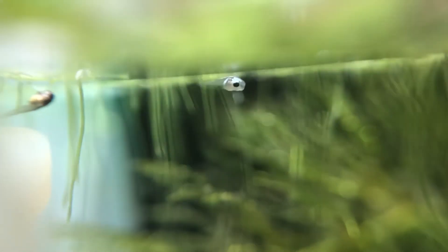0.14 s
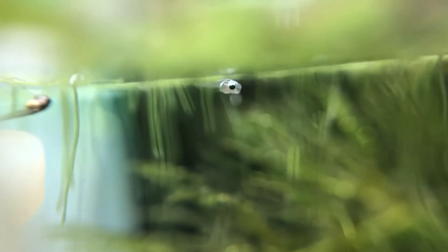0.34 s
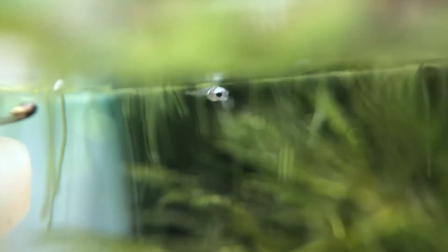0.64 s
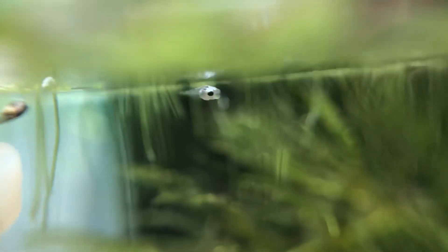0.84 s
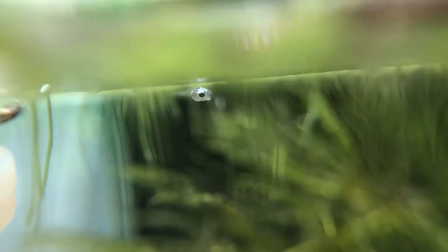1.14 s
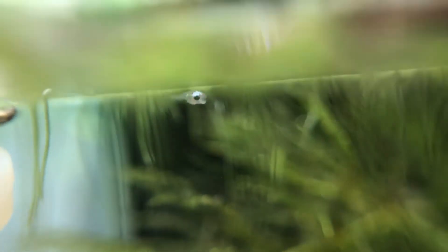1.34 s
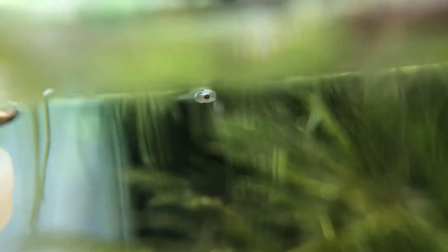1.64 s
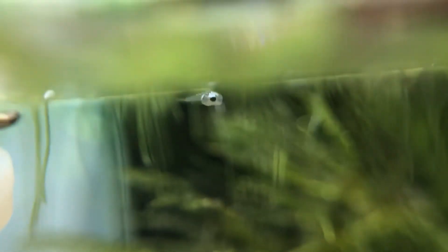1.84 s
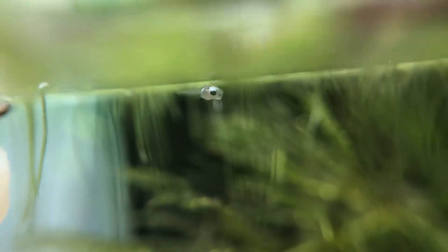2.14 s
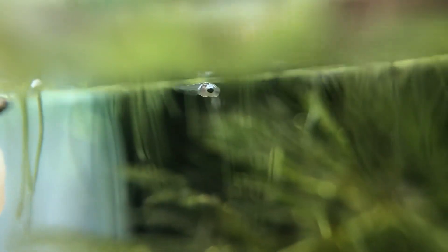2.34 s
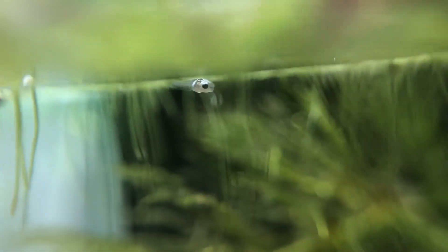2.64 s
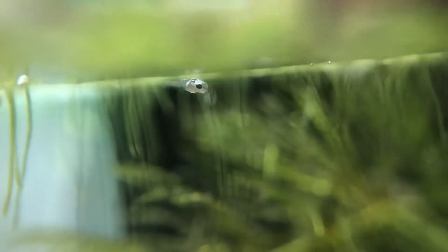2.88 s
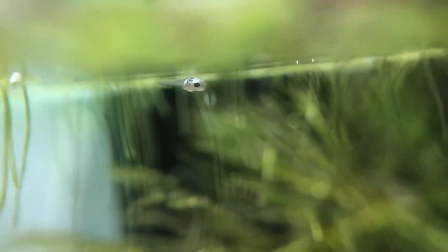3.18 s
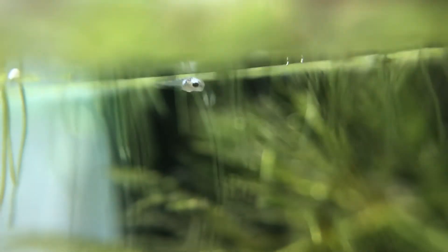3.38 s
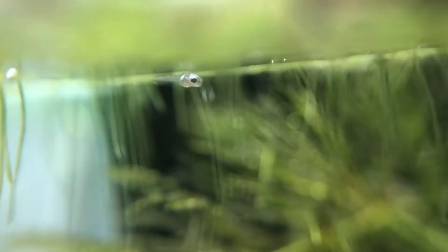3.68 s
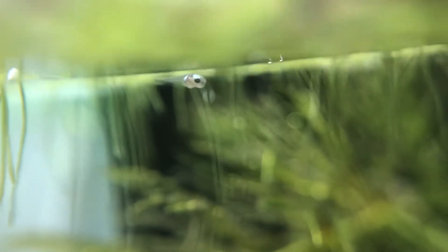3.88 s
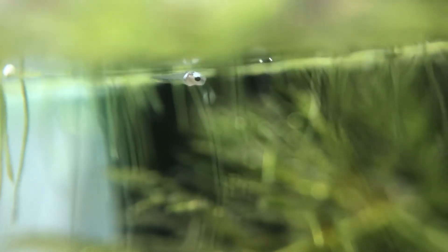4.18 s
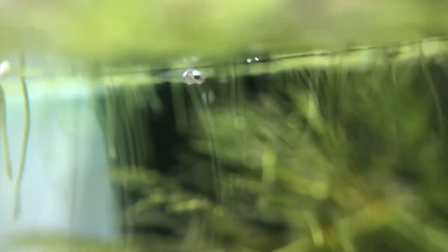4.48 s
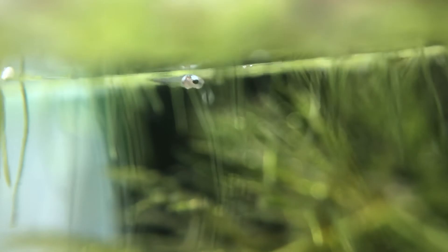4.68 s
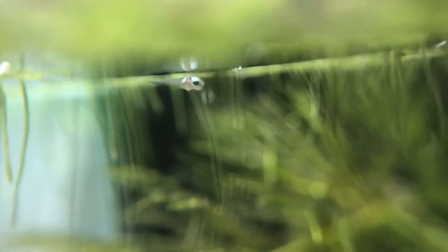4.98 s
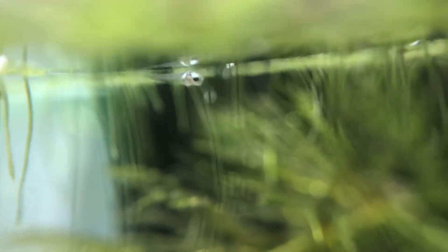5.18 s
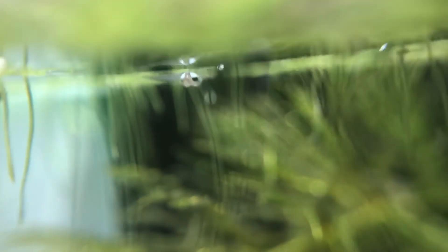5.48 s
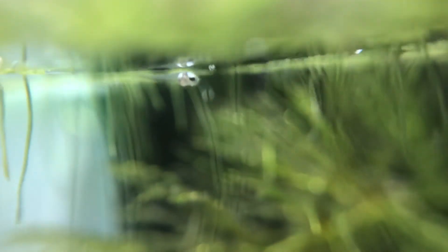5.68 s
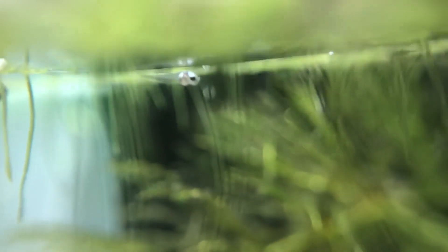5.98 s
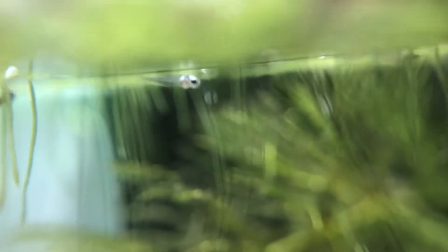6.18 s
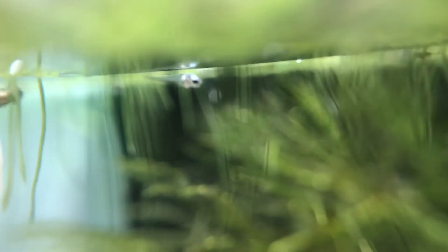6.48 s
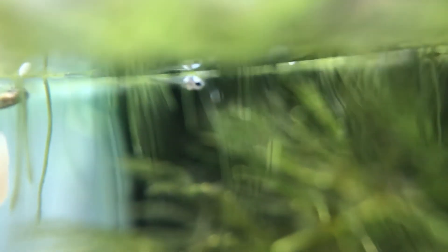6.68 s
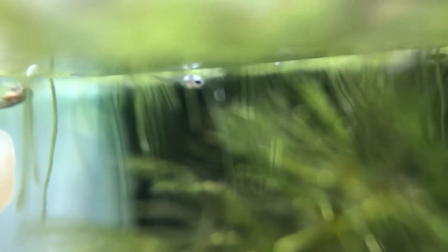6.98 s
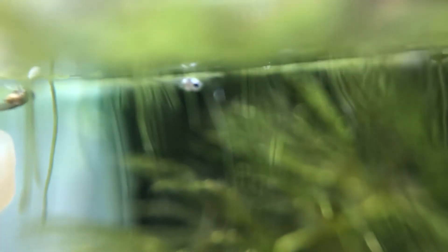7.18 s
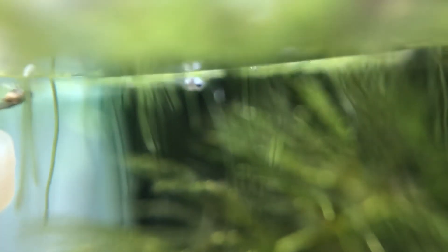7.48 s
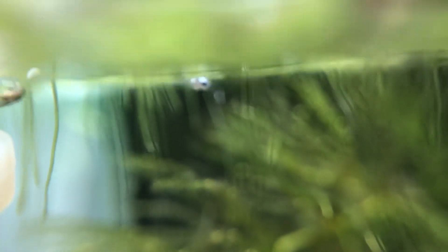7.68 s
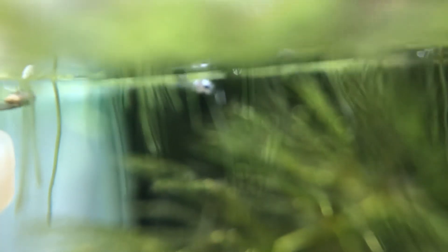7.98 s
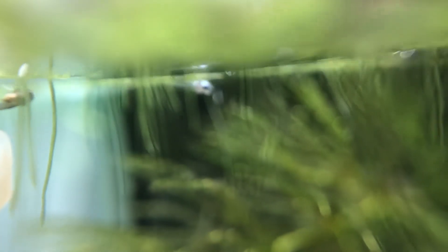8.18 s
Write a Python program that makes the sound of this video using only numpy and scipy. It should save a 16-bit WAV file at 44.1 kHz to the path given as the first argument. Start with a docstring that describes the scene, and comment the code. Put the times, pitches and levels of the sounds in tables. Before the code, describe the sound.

A quick chain of hollow bubble pops and glugs plays inside a fish tank over low equipment hum, with two sharp clicks on the glass.

```python
"""Gurgling home aquarium

Water gurgles in a home aquarium, heard close and dull through its glass wall.
Bubbles come in a quick chain, each a pop and then short gliding rings, over noisy swarms that stir the
tank's resonances; the biggest stand out as glugs. Small ticks and rustles touch the tank, and twice
the glass is knocked: a click whose high pitches arrive before its low ones.
Underneath, the equipment hums at mains rate and gives off a buzz, hiss and a thin, chopped whine."""
import sys
import numpy as np
from scipy import signal
from scipy.fft import rfft, irfft, next_fast_len
from scipy.io import wavfile
from scipy.ndimage import uniform_filter1d

SR = 44100
rng = np.random.default_rng(int(sys.argv[2]) if len(sys.argv) > 2 else 0)


def master_out(mix):
    """Clip the mix to full scale and print it as 16-bit PCM to the path in sys.argv[1]."""
    frames = np.transpose(np.atleast_2d(mix))
    ceiling = np.clip(frames, -1, 1)
    pcm = np.round(ceiling * 32767).astype(np.int16)
    wavfile.write(sys.argv[1], SR, pcm)


N = 367353  # length in samples

# Single big bubbles: loudest_s, pitch_hz, peak_db, fade_s, glide (share of the pitch per second)
GLUGS = [(0.065, 738, -34.5, 0.016, 2.5), (0.076, 553, -32, 0.0097, -5.5), (0.088, 554, -32.5, 0.007, 4),
         (0.119, 570, -29, 0.0058, -1), (0.431, 557, -27.5, 0.0068, 2), (0.456, 566, -24.5, 0.0065, -1),
         (0.468, 850, -35.5, 0.004, 1), (0.587, 558, -29, 0.014, -0.5), (1.006, 577, -26, 0.0085, 0),
         (1.107, 550, -23.5, 0.003, 1.5), (1.176, 553, -22.5, 0.03, 1), (1.193, 607, -24, 0.028, -5),
         (1.21, 647, -26.5, 0.01, -3.5), (1.283, 599, -23, 0.0043, -2.5), (1.385, 562, -19.5, 0.0041, -3),
         (1.495, 584, -12, 0.0047, -1.5), (1.511, 536, -21, 0.0067, -2), (1.612, 594, -20.5, 0.0076, 1.5),
         (1.634, 549, -21.0, 0.006, 2), (1.677, 556, -18.5, 0.0044, 2.5), (1.693, 582, -15.5, 0.0065, 3),
         (1.713, 590, -22, 0.006, -6.5), (1.732, 732, -24, 0.0073, -0.5), (1.735, 527.5, -26, 0.022, 0.5),
         (1.751, 638, -19.5, 0.009, -5.5), (1.758, 882, -28, 0.0048, 2), (1.776, 625, -19.5, 0.0077, -5),
         (1.777, 903, -32, 0.0049, 2.5), (1.804, 618, -24.5, 0.0093, -2), (1.848, 586, -17.5, 0.0033, 0.5),
         (2.076, 532, -21.5, 0.005, -2), (2.116, 910, -33, 0.006, 1), (2.138, 490, -22.5, 0.0047, 6.5),
         (2.23, 503, -27.5, 0.0071, 8), (2.272, 547, -22, 0.0047, 5), (2.41, 722, -29.5, 0.0081, -4),
         (2.422, 502, -27, 0.0066, -10), (2.439, 520, -24.5, 0.0084, 3.5), (2.728, 546, -26, 0.0049, 4),
         (2.839, 532, -26, 0.0061, -8), (2.87, 508, -26, 0.0043, 0), (2.92, 525, -24, 0.0043, 8),
         (3.159, 884, -31.5, 0.0072, 1), (3.166, 527, -19, 0.0057, 1.5), (3.182, 500, -24.5, 0.0041, 9),
         (3.185, 708, -29, 0.009, -1.5), (3.27, 499, -26.5, 0.012, 2), (3.42, 523, -19.5, 0.0071, -4.5),
         (3.626, 536, -27.5, 0.012, 0), (3.73, 508, -26, 0.0098, 0), (3.746, 487, -18.5, 0.0035, 9),
         (3.753, 300, -24, 0.0039, -10), (3.789, 490, -21, 0.0043, 2), (3.807, 267, -27.5, 0.0077, 6),
         (3.808, 572, -21, 0.004, 3), (3.853, 521, -26, 0.011, -5.5), (4.074, 278, -21.5, 0.0069, -1),
         (4.094, 439, -24.5, 0.0073, -3), (4.125, 567, -22, 0.004, 1), (4.236, 557, -22, 0.0041, -6),
         (4.303, 524, -20, 0.0093, 7.5), (4.397, 405, -24.5, 0.0054, 6), (4.551, 520, -24, 0.0035, 3),
         (4.609, 282, -23.5, 0.0049, -5), (4.614, 500, -14, 0.0038, 14), (4.63, 289, -23, 0.0037, -8),
         (4.63, 579, -18.5, 0.0078, 3), (4.65, 490, -21.5, 0.0046, 12), (4.908, 730, -29, 0.008, 0.5),
         (4.936, 506, -20, 0.0042, 5), (4.936, 922, -29.5, 0.0069, 1.5), (4.953, 890, -28.5, 0.0047, -12),
         (4.973, 873, -28.5, 0.0088, 1), (4.99, 514, -21.5, 0.0043, 6), (5.02, 506, -19.5, 0.004, 5),
         (5.041, 568, -14.5, 0.0027, 6), (5.057, 518, -25.5, 0.012, -2), (5.115, 493, -21, 0.0035, 7),
         (5.131, 582, -21.5, 0.0052, 7), (5.325, 442, -26.5, 0.009, 2), (5.341, 533, -23.5, 0.0081, 8.5),
         (5.357, 625, -21.5, 0.004, -3), (5.359, 280, -27, 0.011, 1), (5.363, 505, -22, 0.0037, 14),
         (5.445, 556, -21.5, 0.0075, 6), (5.531, 543, -23.5, 0.0055, -1), (5.628, 524, -15.5, 0.0033, 11),
         (5.674, 533, -18, 0.0027, 7), (5.71, 940, -23, 0.0023, -10), (5.713, 496, -21.5, 0.0056, 4),
         (5.722, 1027, -34.5, 0.011, -0.5), (5.735, 907, -29, 0.0066, -4.5),
         (5.809, 532, -20.5, 0.0092, 1.5), (5.939, 492, -20.5, 0.0036, -4), (5.942, 365, -29, 0.0073, 0),
         (6.005, 535, -19.5, 0.0037, -2), (6.033, 493, -22.5, 0.0038, 8), (6.098, 552, -19, 0.0063, 4),
         (6.121, 514, -19, 0.0027, 8), (6.177, 520, -20, 0.0034, 9), (6.255, 361, -26.5, 0.0082, 0),
         (6.377, 494, -22.5, 0.0035, -3), (6.396, 524, -22.5, 0.0053, -5.5), (6.437, 536, -27, 0.0043, 5),
         (6.634, 512, -25, 0.01, 7.5), (6.838, 546, -18.5, 0.0055, 5), (6.852, 610, -21.5, 0.0053, 0),
         (6.896, 472, -23.5, 0.005, 9), (6.942, 286, -17.5, 0.0044, 3), (6.945, 523, -23.5, 0.0066, 11),
         (7.007, 508, -21.5, 0.0043, -1), (7.044, 518, -19, 0.0039, 20), (7.103, 480, -20, 0.0035, 3.5),
         (7.124, 540, -18.5, 0.0037, 4), (7.173, 408, -19, 0.0056, 2), (7.178, 283, -24.5, 0.007, 8),
         (7.211, 580, -15.5, 0.0066, 0), (7.232, 508, -20, 0.0038, -4.5), (7.377, 525, -19.5, 0.0034, 0.5),
         (7.451, 534, -16.5, 0.004, 0.5), (7.559, 571, -24, 0.016, -5), (7.639, 475, -19.5, 0.0063, 5.5),
         (7.643, 730, -24.5, 0.0094, 0), (7.644, 292, -24, 0.012, 0), (7.689, 270, -23.5, 0.0075, -5),
         (7.693, 498, -20, 0.004, 5), (7.711, 557, -18, 0.0052, 8.5), (7.733, 537, -16, 0.0049, -6.5),
         (7.737, 283, -25.5, 0.012, 2), (7.779, 477, -20.5, 0.0035, 5.5), (7.815, 540, -20, 0.006, 9.5),
         (7.833, 719, -28, 0.01, -0.5), (7.859, 483, -25, 0.012, -1), (7.937, 289, -25, 0.0049, -6),
         (7.942, 500, -18.5, 0.0033, 12), (7.959, 533, -21.5, 0.0076, 2), (7.985, 530, -17, 0.0035, 3),
         (7.989, 286, -24, 0.0085, 9), (8.025, 507, -22.5, 0.0036, 10), (8.048, 524, -23, 0.0043, -6),
         (8.067, 514, -23, 0.008, -5)]
# The loudest pops, each the start of a bubble: start_s, level_db (before a common lift)
POPS = [(0.010, -41.5), (0.106, -43.5), (0.347, -44), (0.466, -42.5), (0.555, -42), (0.667, -43),
        (1.095, -37), (1.197, -41.0), (1.439, -34), (1.483, -37.5), (1.533, -39.0), (1.581, -40.5),
        (1.667, -37.5), (1.744, -36.5), (2.052, -39.5), (2.129, -40.5), (2.433, -43.5), (2.614, -40),
        (2.711, -36), (2.929, -38.5), (3.155, -38.5), (3.251, -41), (3.714, -38.5), (3.777, -38.5),
        (3.887, -41.5), (3.972, -40), (4.183, -39.5), (4.387, -40), (4.434, -40), (4.52, -40.5),
        (4.64, -36), (4.816, -31.5), (4.88, -39), (4.926, -42), (4.969, -42.5), (5.029, -41.5),
        (5.253, -41), (5.5, -37.5), (5.535, -40.5), (5.579, -39.0), (5.855, -41.5), (6.025, -39.5),
        (6.083, -40.5), (6.165, -41), (6.206, -41), (6.25, -45), (6.306, -45), (6.346, -42.5), (6.381, -42),
        (6.638, -40), (6.692, -40), (6.78, -34), (6.819, -39.5), (6.881, -40.0), (6.934, -36), (7.032, -41),
        (7.077, -38), (7.166, -40.0), (7.198, -32), (7.287, -41.5), (7.325, -42.5), (7.461, -45),
        (7.568, -41.5), (7.61, -43.5), (7.722, -39), (7.769, -36), (7.93, -40.5), (7.993, -43),
        (8.055, -43), (8.092, -41)]
# Resonances of the water-filled tank, for large, middle and small bubbles:
# pitch_hz, width_hz (of one filter pass), level_db (relative, used in the swarms only)
LARGE_MODES = [(255.7, 35.3, 1.5), (297.2, 29.8, 0), (380.5, 63, 1), (439, 60, -0.5)]
MIDDLE_MODES = [(481.8, 50, -4), (546.5, 44.3, 1.5), (601.7, 59, -3)]
SMALL_MODES = [(716.4, 62, 0.5), (770, 150, -13.5), (879, 60, -7.5)]
# Tone colour of a pop: frequency_hz, gain_db (relative)
POP_COLOUR = [(300, -47), (600, -22), (900, -0.5), (1080, 4.5), (1280, 3), (1400, -19.5), (1500, -8.5),
              (1750, -23.5), (2300, -37), (4000, -71.5), (16000, -100)]
# The pitch that middle bubbles favour, before random scatter: time_s, pitch_hz
MIDDLE_PITCH = [(0, 566.7), (1.85, 575), (2.25, 516.5), (8.33, 511)]

MAINS_HZ = 59.99
SPREAD_CYCLES = 1.35  # how late the glass delivers each pitch, in cycles of that pitch
BUBBLES_PER_S = 50  # approximate rate of the chain
MIDDLE_LAG_S = 0.011  # from a pop to the main ring of its bubble


def from_db(db):
    """Turn decibels into a gain."""
    return 10 ** (np.asarray(db) / 20)


def rms_one(x):
    """Scale a sound to an average (rms) strength of 1."""
    return x / np.sqrt(np.mean(x ** 2) + 1e-20)


def in_time(rows):
    """Join the points of each column by straight lines in time."""
    s, *columns = np.transpose(rows)
    return [np.interp(np.arange(N) / SR, s, column) for column in columns]


def at_times(curve, s):
    """Read a curve at the moments s, in seconds."""
    return np.interp(s * SR, np.arange(N), curve)


def wander(per_s):
    """Slow random curve with a spread near 1, joining `per_s` new values a second."""
    values = rng.standard_normal(1000)
    return np.interp(np.arange(N) / SR * per_s, np.arange(len(values)), values)


def chance(s, count):
    """Draw `count` limited bell-curve values for each moment; moments in one 10 ms slot share them."""
    draws = np.clip(rng.standard_normal((1000, count)), -2, 2)
    return draws[(s * 100).astype(int)].T


def coloured(x, colour, spread=0, tilt_db=0):
    """Shape a spectrum. Bending waves in glass carry highs faster: each pitch comes about `spread` cycles late."""
    size = next_fast_len(len(x) + SR // 2)
    hz = np.maximum(np.arange(size // 2 + 1) * SR / size, 1)
    points = np.array(colour, float)
    octaves = np.log2(hz / 300)  # the tilt leaves 300 Hz alone
    colour_db = np.interp(np.log(hz), np.log(points[:, 0]), points[:, 1])
    gain = from_db(colour_db + tilt_db * octaves)
    spread_end_hz = 11  # keeps the delay of the very lowest pitches limited
    lag = np.exp(-2j * np.pi * spread * np.log(hz + spread_end_hz))
    return irfft(rfft(x, size) * gain * lag, size)[:len(x)]


def noise(colour):
    """Smooth noise of a given colour, with rms 1."""
    return rms_one(coloured(rng.standard_normal(N), colour))


def resonate(x, hz, width_hz):
    """Pass a sound through one resonance whose gain is 1 at its centre."""
    r = np.exp(-np.pi * width_hz / SR)
    feedback = [1, -2 * r * np.cos(2 * np.pi * hz / SR), r * r]
    return signal.lfilter(np.array([1, 0, -1]) * (1 - r * r) / 2, feedback, x + 1e-18)


def resonate_moving(x, hz, width_hz):
    """A resonance with a moving centre: shift the pitch curve to zero, smooth, and shift back."""
    turn = np.exp(2j * np.pi * np.cumsum(hz) / SR)
    r = np.exp(-np.pi * width_hz / SR)
    return 2 * np.real(turn * signal.lfilter([1 - r], [1, -r], x / turn + 1e-18))


def evened(x, seconds):
    """Hold the rms near 1 over a short stretch, keeping the grain within it."""
    size = max(int(seconds * SR), 8)
    power = uniform_filter1d(uniform_filter1d(x ** 2, size), size)
    return x / np.sqrt(np.abs(power) + np.mean(x ** 2) / 1e3)


def kicks(per_s, spread_db):
    """Pressure kicks at random moments, most small, a few large."""
    sizes_db = spread_db * np.minimum(rng.exponential(1, N), 4)
    sizes = from_db(sizes_db) * rng.choice([-1, 1], N)
    return sizes * (rng.random(N) < per_s / SR)


def swells(s, length_s, db):
    """Add the power of overlapping bell-shaped swells."""
    t = np.arange(0, N + 40, 40) / SR  # every 40 samples is fine enough
    bells = np.exp(-(2 * (t - s[:, None]) / length_s[:, None]) ** 2)
    return np.interp(np.arange(N) / SR, t, from_db(db) ** 2 @ bells)


def mains_hum(cycles):
    """Steady pure tones at whole multiples of the mains rate."""
    # multiple (of the mains rate), level_db (rms)
    hum_tones = [(1, -54.5), (2, -51)]
    hum = np.zeros(N)
    for multiple, db in hum_tones:
        hum += from_db(db) * np.sqrt(2) * np.sin(2 * np.pi * (round(multiple) * cycles + rng.random()))
    return hum


def buzz_and_whine(cycles):
    """One coloured tick per mains cycle, and narrow noise bands that drop out once per cycle."""
    # frequency_hz, gain_db (relative)
    buzz_colour = [(1200, -24), (1850, 3.5), (2200, -8.5), (2500, -2), (3200, -10.5), (4500, -25.5),
                   (9000, -42)]
    # pitch_hz, width_hz (halved; each band is filtered twice at double this), level_db (rms while sounding)
    whine_bands = [(5010, 35, -79.5), (5150, 260, -82), (10020, 76, -81), (15000, 90, -98.5)]
    gap_start, gap_share = 0.054, 0.24  # in shares of a mains cycle
    beat = np.diff(np.floor(cycles - gap_start - gap_share), prepend=-1)  # a tick as each gap ends
    buzz = from_db(-80.0) * rms_one(coloured(beat, buzz_colour, spread=7.3))
    running = uniform_filter1d(1.0 * ((cycles - gap_start) % 1 > gap_share), size=40)
    whine = np.zeros(N)
    for hz, width, db in whine_bands:
        band = resonate(resonate(rng.standard_normal(N), hz, 2 * width), hz, 2 * width)
        whine += from_db(db) * evened(band, 0.0036)
    return buzz + running * whine


def hiss_and_spit(cycles):
    """Steady coloured hiss, and bursts of brighter noise once per mains cycle."""
    # frequency_hz, gain_db (relative)
    hiss_colour = [(1500, -7.5), (2300, 0), (3400, -0.5), (4400, -3), (5900, -7.5), (6700, -1.5),
                   (7500, -8), (8500, -2.5), (10200, -8), (11500, -9.5), (15700, -14)]
    # how hard the hiss spits: time_s, level_db (rms with the pauses included)
    spit_curve = [(0, -83), (6.7, -83.5), (6.95, -80.5), (7.6, -78.5), (7.8, -81.5), (8.33, -82.5)]
    spit_db, = in_time(spit_curve)
    spitting = (cycles - 0.29) % 1 < 0.17  # start and length in shares of a cycle
    spit_colour = [(3000, -21.5), (6500, 0.0), (10000, -0.5), (12000, -16.0)]
    spit = from_db(spit_db) * rms_one(coloured(spitting * rng.standard_normal(N), spit_colour))
    return spit + from_db(-75) * noise(hiss_colour)


def equipment():
    """Electrical sounds, all timed by the same mains cycle."""
    cycles = MAINS_HZ * np.arange(N) / SR
    return mains_hum(cycles) + buzz_and_whine(cycles) + hiss_and_spit(cycles)


def stirred_water():
    """Low slosh and a soft wash: coloured noises that follow how much the water is stirred."""
    # time_s, level_db (before the offsets of slosh and wash)
    stir_curve = [(0, -44), (.23, -49.5), (.69, -46), (.88, -40), (1.5, -43.5), (1.8, -39.5), (2.2, -51.5),
                  (2.8, -52.5), (3.5, -50.5), (4.6, -47), (5.8, -49), (6.7, -46.5), (6.84, -42), (7.2, -49),
                  (8.33, -45.5)]
    # both colours: frequency_hz, gain_db (relative)
    slosh_colour = [(20, -34), (45, -8), (58, 10.5), (80, 2.5), (115, 2), (160, 10), (200, 1.5), (330, 4),
                    (700, -2.5), (1200, -43.5), (4000, -87)]
    wash_colour = [(700, -23.5), (1300, 10), (1650, -1.5), (2100, -6.5), (2300, -30.5), (4000, -41),
                   (12000, -73.5)]
    stir_db, = in_time(stir_curve)
    slosh = from_db(stir_db + 3.5) * noise(slosh_colour)
    wash = from_db(stir_db - 21.5) * noise(wash_colour)
    return slosh + wash


def bubbling():
    """Strength of large, middle and small bubbles: gurgles swell from a simmer, and uneven air makes them flutter."""
    # one swarm per row: crest_s, length_s, large_db, middle_db, small_db (levels before flutter and mix)
    gurgle_rows = [(0.087, 0.19, -38.5, -35.5, -44.5), (0.273, 0.043, -41, -35.5, -47.5),
                   (0.401, 0.2, -39.5, -38, -48.5), (0.62, 0.064, -36, -35.5, -47.5),
                   (0.802, 0.14, -46, -38, -47.5), (1.107, 0.05, -32.5, -32.5, -50),
                   (1.167, 0.099, -31, -33.5, -40.5), (1.372, 0.027, -50, -28, -49),
                   (1.481, 0.071, -33.5, -33.5, -40.5), (1.716, 0.15, -36, -29, -38.5),
                   (1.776, 0.031, -36.5, -30.5, -51), (1.865, 0.073, -41.5, -30.5, -41.5),
                   (2.133, 0.042, -31, -41, -43), (2.234, 0.156, -54, -58, -46),
                   (2.426, 0.036, -38, -51.0, -40), (2.558, 0.023, -39, -33.5, -44),
                   (2.709, 0.03, -34, -31, -43), (2.851, 0.043, -41.5, -29.5, -39.5),
                   (2.916, 0.073, -44, -35, -38), (3.042, 0.057, -38, -35, -47),
                   (3.188, 0.099, -36.5, -38, -42), (3.403, 0.055, -41.5, -33.5, -43),
                   (3.632, 0.062, -36.5, -36.5, -43), (3.776, 0.074, -31, -31.5, -42.5),
                   (3.86, 0.083, -34, -33, -48.5), (4.116, 0.036, -30, -34.0, -35.5),
                   (4.323, 0.037, -42, -42, -43.5), (4.467, 0.19, -32, -37, -46.5),
                   (4.625, 0.091, -34, -37, -41), (4.868, 0.086, -31, -33.5, -47),
                   (5.019, 0.17, -30.5, -32, -42), (5.153, 0.019, -29.5, -29, -38),
                   (5.248, 0.11, -33, -35, -45), (5.357, 0.031, -32.5, -31, -41),
                   (5.418, 0.22, -36, -41.5, -55), (5.595, 0.13, -30.5, -32, -37),
                   (5.695, 0.12, -43, -35, -42.5), (5.782, 0.108, -34, -32, -40.5),
                   (6.014, 0.05, -33.5, -34, -45), (6.115, 0.08, -41.5, -30.5, -43),
                   (6.243, 0.13, -42, -32.5, -48), (6.39, 0.08, -40, -30.5, -44.5),
                   (6.587, 0.095, -42.5, -33.5, -43), (6.782, 0.13, -41, -38, -41),
                   (6.848, 0.031, -34, -30.5, -35.5), (6.98, 0.12, -35, -44, -44.0),
                   (7.119, 0.097, -29, -47.5, -39.5), (7.221, 0.033, -29, -34.5, -36.5),
                   (7.361, 0.11, -31.5, -33.5, -36.5), (7.45, 0.053, -27, -28, -39),
                   (7.563, 0.05, -30.5, -29.5, -40), (7.631, 0.058, -40, -38, -39.5),
                   (7.747, 0.108, -30, -29.5, -42.5), (7.853, 0.047, -36, -26.5, -36.0),
                   (7.941, 0.15, -31.5, -31, -46.5), (8.085, 0.157, -53.5, -48, -39.5)]
    # steady bubbling between gurgles: time_s, level_db (before the offset of each size)
    simmer_curve = [(0.0, -51), (1.1, -40.5), (1.85, -36.5), (2.5, -41.5), (3.5, -40), (4.2, -36.5),
                    (5.2, -38.5), (6.5, -44), (7.4, -32.5), (8.33, -38.5)]
    large_lead_s = 0.016  # the large bubbles of a gurgle come first
    s, length_s, large_db, middle_db, small_db = np.transpose(gurgle_rows)
    simmer_db, = in_time(simmer_curve)
    # crest, gurgle level and simmer offset in dB for each size
    sizes = [(s - large_lead_s, large_db, -4), (s, middle_db, 0), (s, small_db, -12.5)]
    strengths = []
    for crest, db, offset_db in sizes:
        power = swells(crest, length_s, db) + from_db(simmer_db + offset_db) ** 2
        flutter_db = 1.96 * wander(per_s=22)
        strengths.append(np.sqrt(power) * from_db(flutter_db))
    return strengths


def swarm(births, modes, low_hz, high_hz, extra=0, even_s=0.04):
    """Every bubble kicks each tank resonance with its own strength; a ring swells before it fades."""
    rings = extra
    for hz, width, db in modes:
        hits = births * rng.normal(0.62, 1, N)
        rings = rings + from_db(db) * resonate(resonate(hits, hz, width), hz, width)
    band = signal.butter(4, [low_hz, high_hz], "band", fs=SR, output="sos")
    return evened(signal.sosfilt(band, rings), even_s)


def gurgle(large_gain, middle_gain, small_gain):
    """Swarms of three bubble sizes; the favoured pitch of the smaller two wanders with their size."""
    # the wander is a share of the pitch
    middle_hz = in_time(MIDDLE_PITCH)[0] * (1 + 0.042 * wander(per_s=14))
    small_hz = 774 * (1 + 0.044 * wander(per_s=14))
    births = kicks(per_s=180, spread_db=1.5)
    small_births = kicks(per_s=110, spread_db=2.0)
    middle_ring = resonate_moving(births, middle_hz, width_hz=45)
    middle_ring = from_db(2.0) * resonate_moving(middle_ring, middle_hz, width_hz=45)
    small_ring = from_db(-6.5) * resonate_moving(small_births, small_hz, width_hz=320)
    large = swarm(births, LARGE_MODES, low_hz=203.0, high_hz=479.0, even_s=0.043)
    middle = swarm(births, MIDDLE_MODES, low_hz=433.7, high_hz=659.0, extra=middle_ring, even_s=0.022)
    small = swarm(small_births, SMALL_MODES, low_hz=684, high_hz=1000, extra=small_ring, even_s=0.054)
    return large_gain * large + middle_gain * middle + small_gain * small


def bubble_chain():
    """Times of a quick, nearly even chain of bubbles, tied to the loud pops and main glugs."""
    main = [s - MIDDLE_LAG_S for s, hz, *_ in GLUGS if 450 < hz < 660]
    loud = np.sort([0, N / SR] + main + [s for s, _ in POPS])
    loud = loud[np.diff(loud, prepend=-1) > 0.5 / BUBBLES_PER_S]  # drop those too close together
    links = []
    for a, b in zip(loud, loud[1:]):
        count = max(round((b - a) * BUBBLES_PER_S), 1)
        links.append(np.linspace(a, b, count, endpoint=False))
    chain = np.concatenate(links)
    jitter_s = 0.0029 * chance(chain, count=1)[0]
    return chain + jitter_s * ~np.isin(chain, loud)


def pops(rows):
    """Short wet blips of random brightness; strong ones tend to be brighter."""
    lead, out = SR // 50, np.zeros(N + SR)
    click = signal.unit_impulse(3 * lead, lead)
    # five shapes, tilted from -8 to +8 dB per octave
    shapes = [coloured(click, POP_COLOUR, SPREAD_CYCLES, 8 * step / 2) for step in range(-2, 3)]
    for (s, db), (bright, sign) in zip(rows, chance(rows[:, 0], count=2).T):
        step = round(np.clip(bright + (db + 38) / 10, -2, 2))  # above -38 dB leans bright
        shape, start = shapes[2 + step], round(s * SR)
        out[start:start + len(shape)] += np.sign(sign) * from_db(db) * shape / np.abs(shape).max()
    return out[lead:lead + N]


def surface_pops(chain, small_gain):
    """Every bubble of the chain starts with a pop; the glass wall rings and the tank returns an echo."""
    follow = 0.38  # how closely the lesser pops and froth follow the small bubbles
    distance_s = abs(chain[:, None] - np.array(POPS)[:, 0]).min(axis=1)
    lesser = chain[distance_s > 0.5 / BUBBLES_PER_S]
    swell_db = 20 * np.log10(at_times(small_gain, lesser) / small_gain.mean())
    lesser_db = -51.5 + follow * swell_db + 4.5 * chance(lesser, count=1)[0]
    blips = from_db(1.5) * pops(np.vstack([POPS, np.transpose([lesser, lesser_db])]))
    # froth: small bursts overlap at random
    froth = evened(coloured(kicks(per_s=160, spread_db=3.5), POP_COLOUR, SPREAD_CYCLES), 0.098)
    blips += from_db(-61.5) * (small_gain / small_gain.mean()) ** follow * froth
    wall_ring = from_db(-2.0) * resonate(blips, hz=1348, width_hz=160)
    echo = from_db(-12.5) * np.roll(blips, round(0.0043 * SR))  # back across the tank
    return blips + wall_ring + echo


def glugs(rows, level_db):
    """A bubble swells within a few cycles and dies away, gliding in pitch as it nears the surface."""
    out = np.zeros(N + 2 * SR)  # a second of room at each end
    swell_share = 0.56  # width of the swell, as a share of the fade time
    for (s, hz, db, fade_s, glide), phase in zip(rows, chance(np.array(rows)[:, 0], count=1)[0]):
        t = np.arange(-int(4 * fade_s * SR), int(10 * fade_s * SR)) / SR
        start = SR + round((s + t[0]) * SR)
        swell = np.exp(-0.5 * (t / (swell_share * fade_s)) ** 2)
        shape = np.where(t < 0, swell, 1 / np.cosh(t / fade_s))
        cycles = hz * (t + glide * t * t / 2)
        out[start:start + len(t)] += from_db(db + level_db) * shape * np.sin(2 * np.pi * (cycles + phase))
    return out[SR:SR + N]


def ring_out(s, hz, gain, fade_s, above_db):
    """One short gliding note per lesser bubble, following its gurgle; a big glug replaces a nearby one."""
    size, pitch, length, lift = chance(s, count=4)
    hz = hz * (1 + 0.031 * pitch)
    big_s, big_hz = np.transpose(GLUGS)[:2]
    near_in_time = abs(s[:, None] - big_s) < 0.009
    near_in_pitch = abs(hz[:, None] / big_hz - 1) < 0.18
    taken = (near_in_time & near_in_pitch).any(axis=1)
    db = 20 * np.log10(at_times(gain, s)) + 2.5 * size
    glide = 2 + 3 * lift  # share of the pitch per second
    rows = np.transpose([s, hz, db, fade_s * np.exp(0.39 * length), glide])
    return glugs(rows[~taken], above_db)


def chain_rings(chain, large, middle, small):
    """A few milliseconds after its pop each bubble rings at large, middle and small bubble pitches."""
    # both tables: pitch_hz (before scatter), lag_s (after the pop), fade_s (before scatter),
    # level_db (relative to the gurgle, before scatter)
    large_rings = [(273.2, .013, .009, -8), (385.2, .005, .0075, -4.5)]
    small_rings = [(724, .005, .009, -1.5), (880, .002, .009, -6)]
    favoured_hz = np.interp(chain, *np.transpose(MIDDLE_PITCH))
    out = ring_out(chain + MIDDLE_LAG_S, favoured_hz, middle, fade_s=0.0048, above_db=3.5)
    for rings, gain in (large_rings, large), (small_rings, small):
        for hz, lag_s, fade_s, db in rings:
            out = out + ring_out(chain + lag_s, hz, gain, fade_s, db)
    return out


def tank_ring(x):
    """The tank's resonances carry each single bubble on for a moment."""
    width_share, lag_s = 0.49, 0.011  # narrower resonances, heard a little late
    modes = LARGE_MODES + MIDDLE_MODES + SMALL_MODES
    rings = sum(resonate(x, hz, width_share * width) for hz, width, _ in modes)
    return from_db(-13.0) * np.interp(np.arange(N) - lag_s * SR, np.arange(N), rings, left=0)


def strikes(rows, colour):
    """Clicks through the glass, each scaled to its own peak level."""
    clicks, unit = np.zeros(N), np.zeros(N)
    unit[N // 2] = 1
    for s, db in rows:
        clicks[round(s * SR)] = from_db(db)
    return coloured(clicks, colour, SPREAD_CYCLES) / np.abs(coloured(unit, colour, SPREAD_CYCLES)).max()


def ticks():
    """Tiny bright clicks, each setting a few resonances ringing around its own pitch."""
    # start_s, click_db (peak, before a common lift), kick_db (drive into the ringing), ring_pitch_hz
    tick_rows = [(0.1895, -64, -60, 2900), (0.3089, -67, -57, 2900), (0.707, -66, -50, 2750),
                 (0.9, -66, -46.5, 3570), (1.601, -65.5, -48, 3520), (1.738, -62, -60, 3000),
                 (3.303, -61, -45, 3950), (6.6925, -51, -64, 2600), (6.704, -52, -56, 3900),
                 (6.7803, -38.5, -45, 3700), (6.82, -52.5, -60, 3000)]
    # frequency_hz, gain_db (relative)
    tick_colour = [(800, -39), (1500, -2), (2300, 4), (2700, -5), (3050, -1.5), (3550, 0), (4200, -12),
                   (8000, -26), (14000, -46)]
    # pitch_share (of the tick's ring pitch), width_hz, level_db (added to the kick)
    tick_modes = [(.75, 110, 4), (.87, 110, 4), (1, 100, 7)]
    clicks = strikes([(s, db) for s, db, _, _ in tick_rows], tick_colour)
    tap = strikes([(0.00087, 0)], tick_colour)[:SR // 10]
    rings = np.zeros(N)
    for s, _, kick_db, hz in tick_rows:
        start = round(s * SR)
        for share, width, db in tick_modes:
            rings[start:start + len(tap)] += from_db(kick_db + db) * resonate(tap, share * hz, width)
    return from_db(2.0) * clicks + rings


def rustles():
    """Faint rustles against the tank: a crackle of fine random grains in bell-shaped swells."""
    # crest_s, length_s, level_db
    rustle_rows = [(.2, .06, -69), (.34, .25, -74.5), (1.295, 1.2, -82), (2.188, 0.056, -67.5),
                   (2.36, .06, -70), (2.52, 0.095, -71), (2.902, 1.4, -76.5), (3.335, 0.038, -65),
                   (6.712, .03, -64), (6.774, .04, -60.5), (6.806, 0.026, -55.5)]
    # frequency_hz, gain_db (relative)
    brush_colour = [(700, -26), (1500, 9), (2500, -2), (5000, -6), (7000, -13), (9000, -19.5), (14000, -27)]
    grains = kicks(per_s=2500, spread_db=2.0)
    crackle = evened(coloured(grains, brush_colour), 0.054)
    return np.sqrt(swells(*np.transpose(rustle_rows))) * crackle


def knocks():
    """The glass stretches each knock into a quick falling chirp that ends in a thump."""
    # start_s, strength_db (of the click before colouring), tilt_db (per octave)
    knock_rows = [(0.7233, 26.5, 0), (6.8617, 16.5, -4.5)]
    # frequency_hz, gain_db
    knock_colour = [(18, -39.5), (32, -12.5), (55, 4.5), (85, 5.5), (170, -2.5), (290, 6.5), (450, -4),
                    (750, -12), (1350, -15.5), (1800, -30.5), (2500, -54.5), (4000, -66), (6000, -75),
                    (16000, -95)]
    out = np.zeros(N)
    for s, db, tilt_db in knock_rows:
        click = np.zeros(N)
        click[round(s * SR)] = from_db(db)
        out += coloured(click, knock_colour, SPREAD_CYCLES, tilt_db)
    return out


def thin_notes():
    """Tiny bubbles sing thin, high notes, shaped like those of the big ones."""
    # loudest_s, pitch_hz, level_db (before a common lift), fade_s, glide (share of the pitch per second)
    note_rows = [(1.488, 2020, -73, .022, .2), (1.785, 2040, -70, 0.028, .15), (2.204, 2390, -68, 0.011, 0),
                 (2.318, 1480, -58, 0.0063, 0)]
    return glugs(note_rows, level_db=2.0)


def scene():
    """All the sounds of the tank, added up in one channel."""
    large, middle, small = bubbling()
    chain = bubble_chain()
    swarms = gurgle(from_db(-2.0) * large, from_db(-4.0) * middle, from_db(-1.5) * small)
    singles = glugs(GLUGS, level_db=0.0) + thin_notes() + chain_rings(chain, large, middle, small)
    water = stirred_water() + swarms + surface_pops(chain, small) + singles + tank_ring(singles)
    return (equipment() + water + ticks() + rustles() + knocks())[None]


def record(dry):
    """Cut everything above 15.7 kHz steeply."""
    return signal.sosfilt(signal.ellip(12, 0.1, 80, 15700, fs=SR, output="sos"), dry)


dry = scene()
out = record(dry)
master_out(out)
```